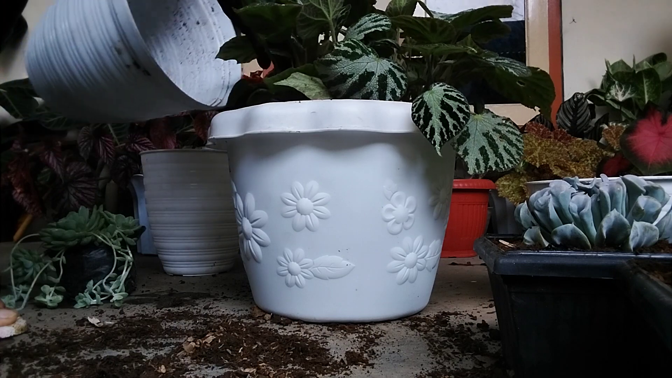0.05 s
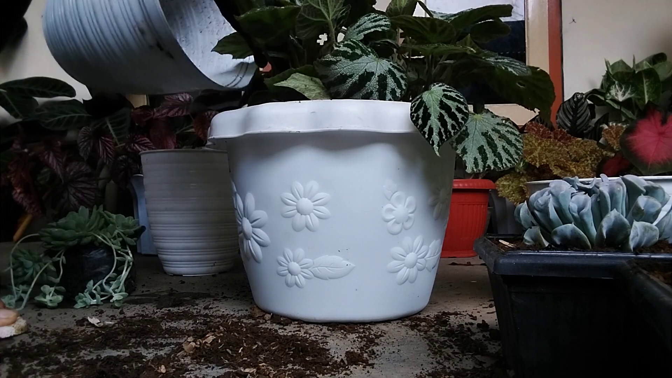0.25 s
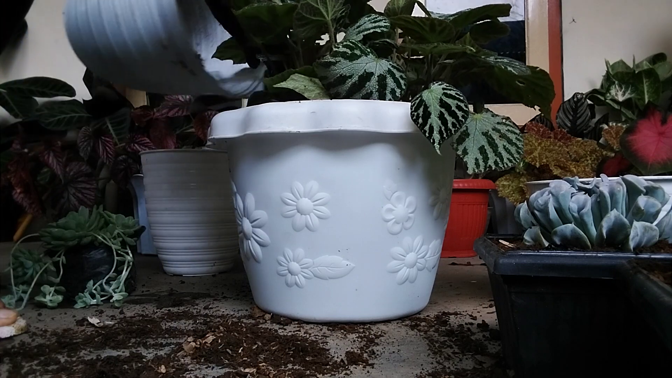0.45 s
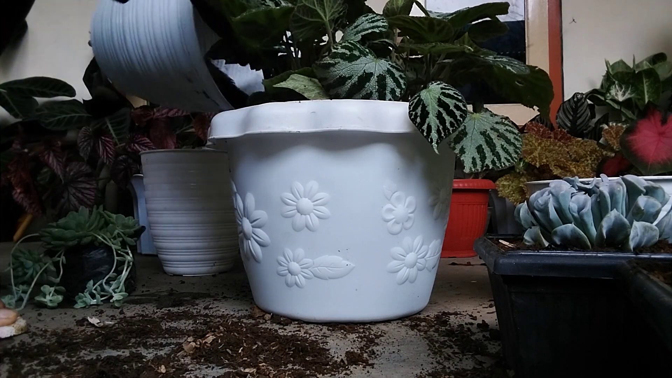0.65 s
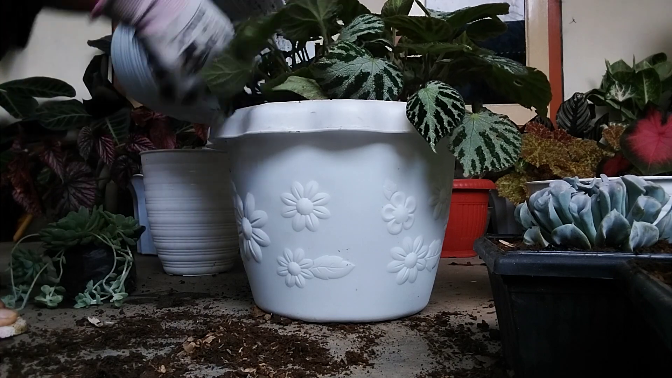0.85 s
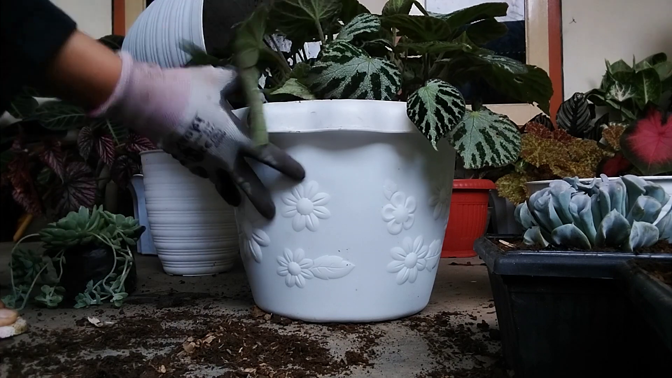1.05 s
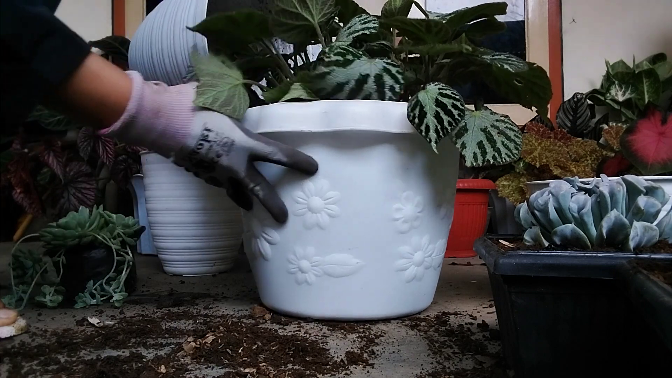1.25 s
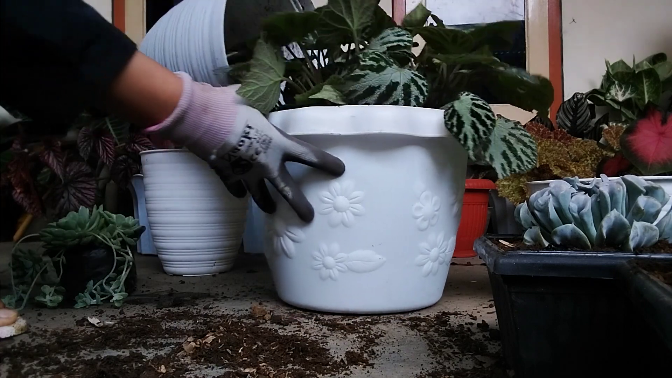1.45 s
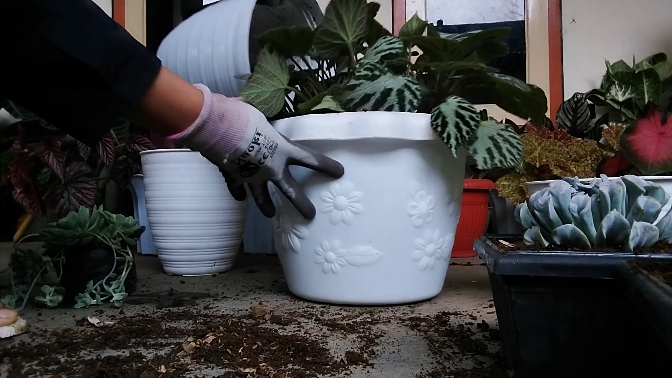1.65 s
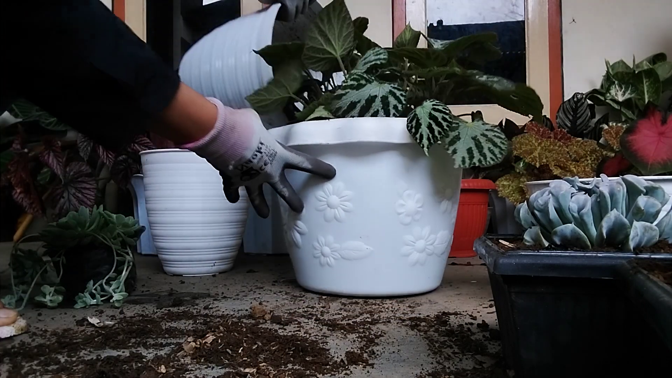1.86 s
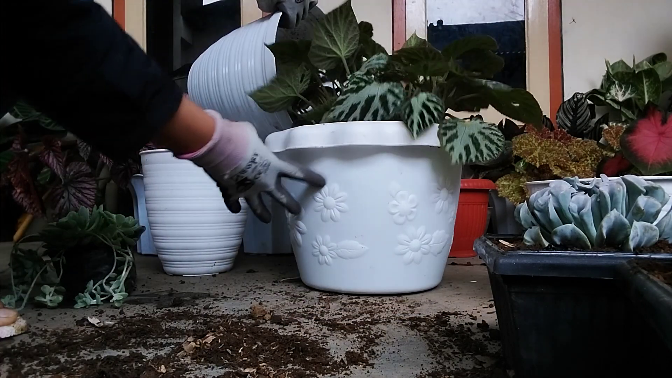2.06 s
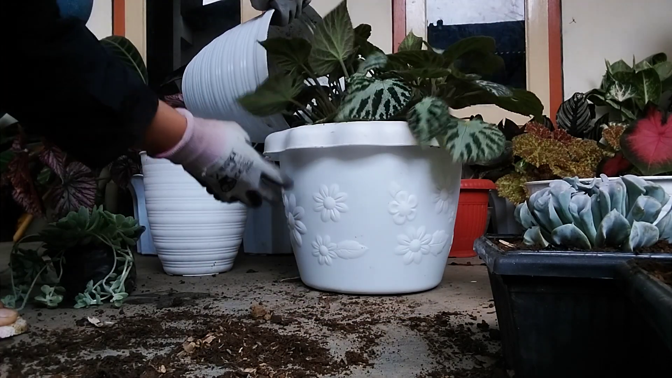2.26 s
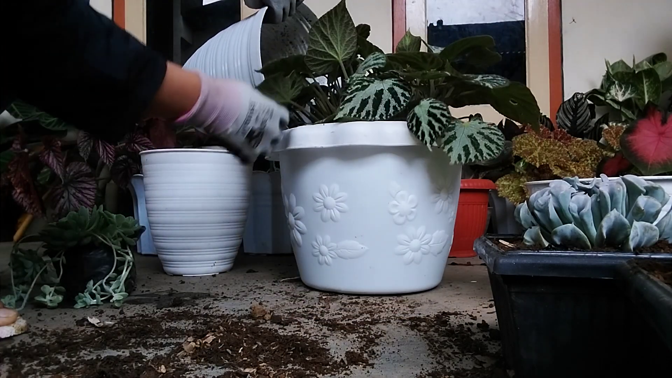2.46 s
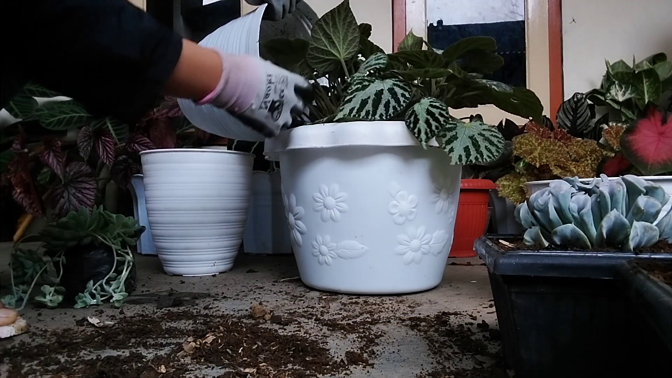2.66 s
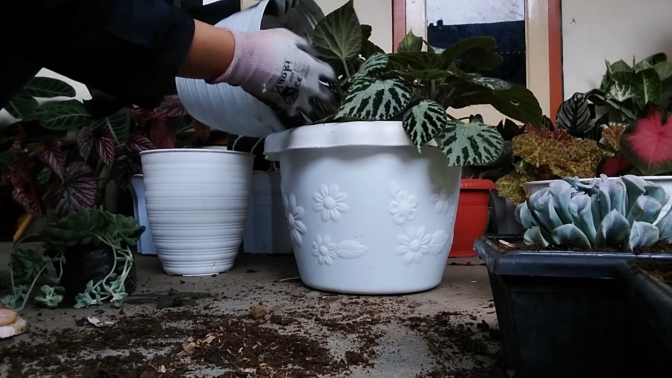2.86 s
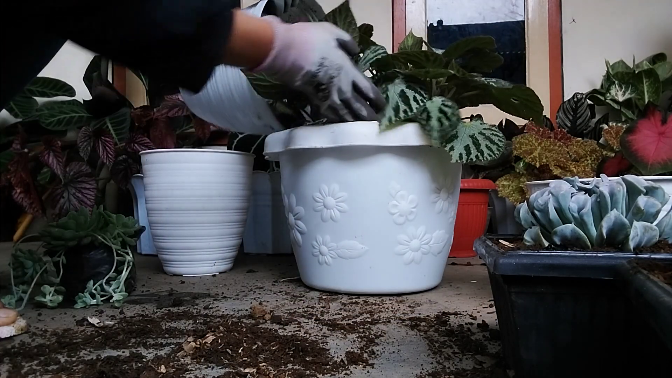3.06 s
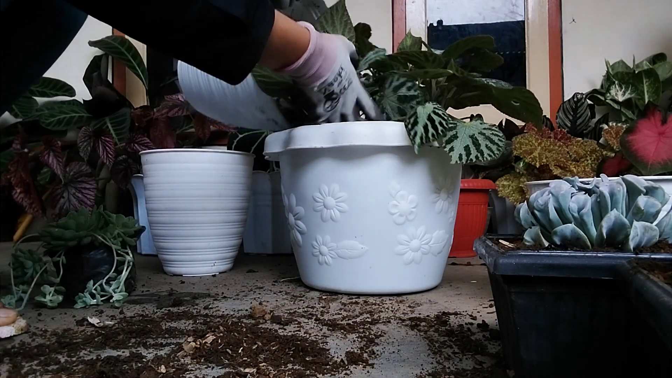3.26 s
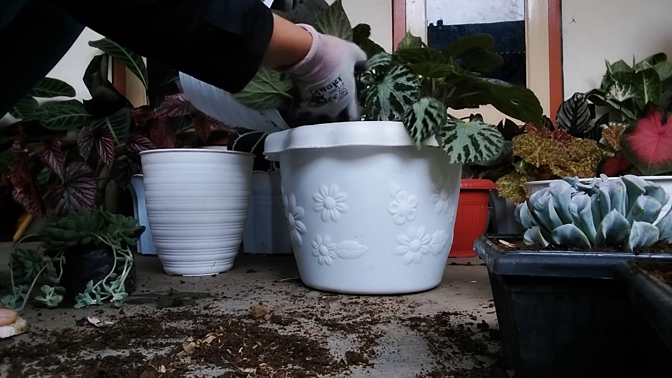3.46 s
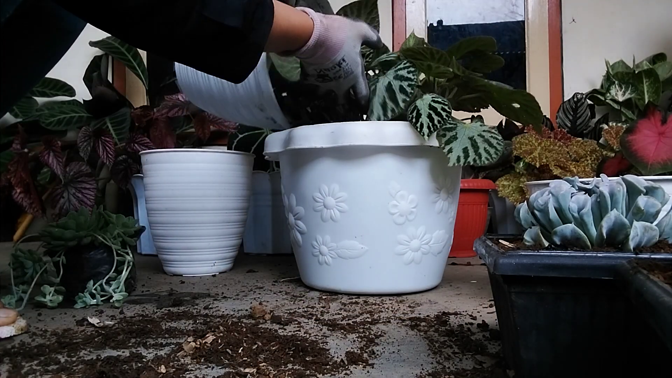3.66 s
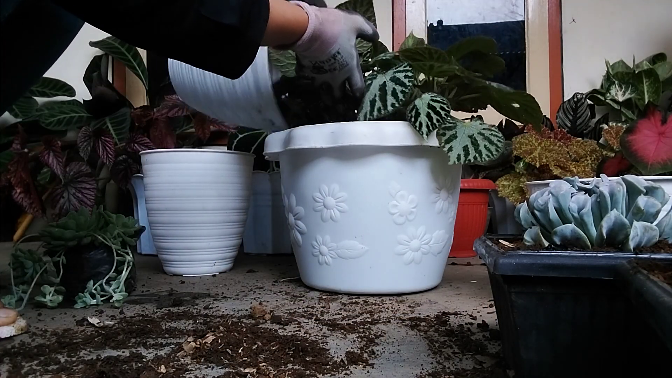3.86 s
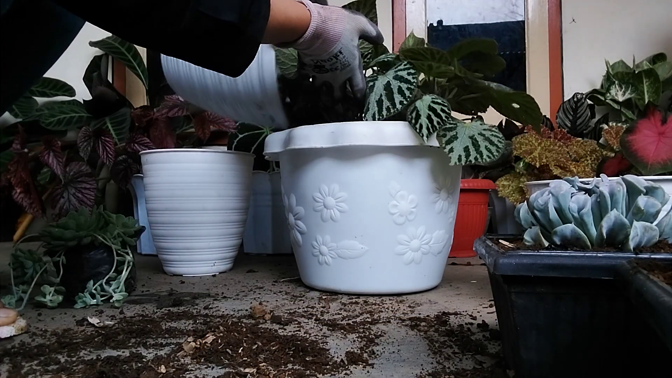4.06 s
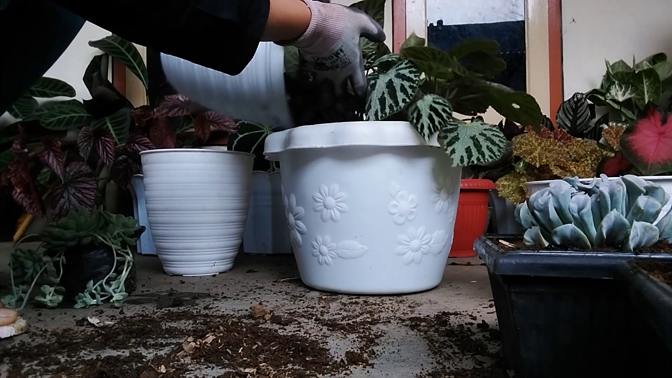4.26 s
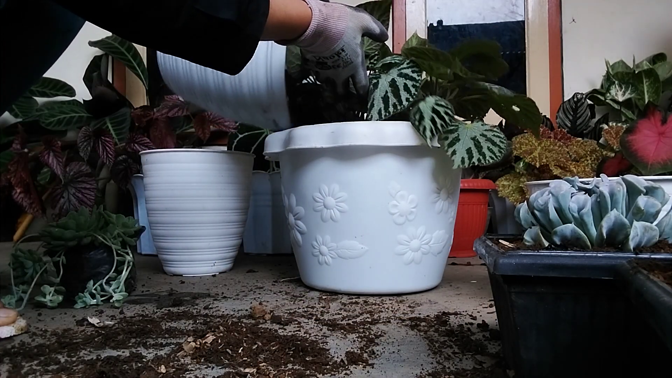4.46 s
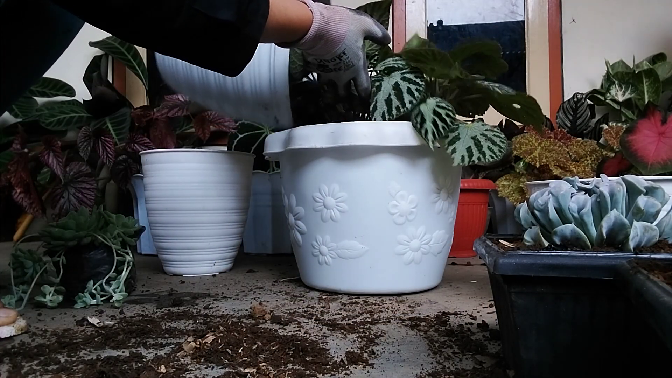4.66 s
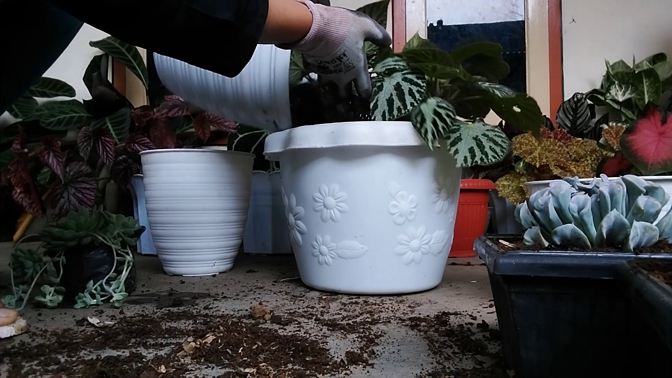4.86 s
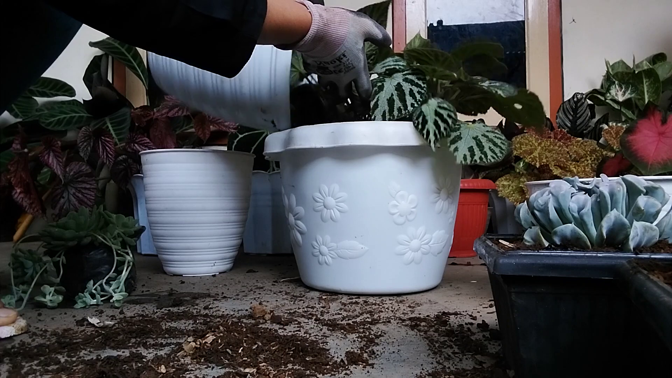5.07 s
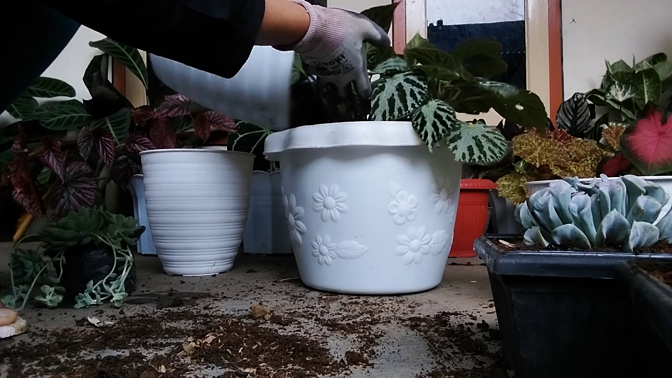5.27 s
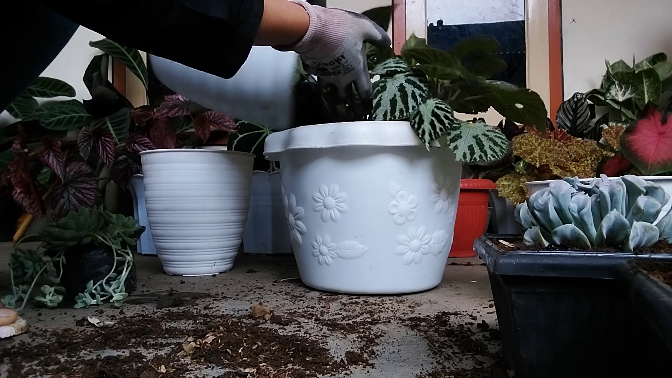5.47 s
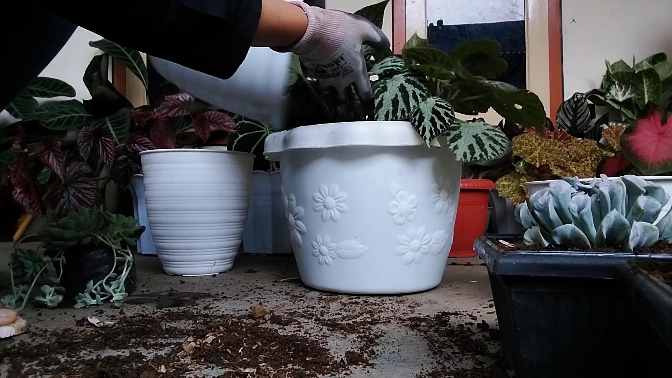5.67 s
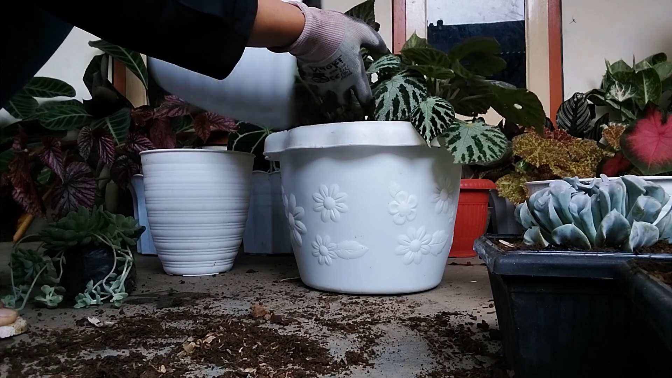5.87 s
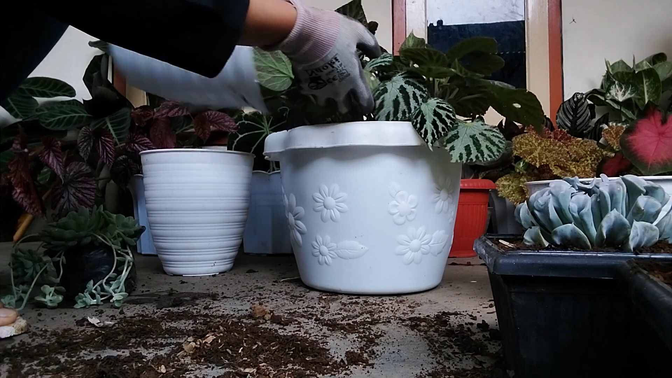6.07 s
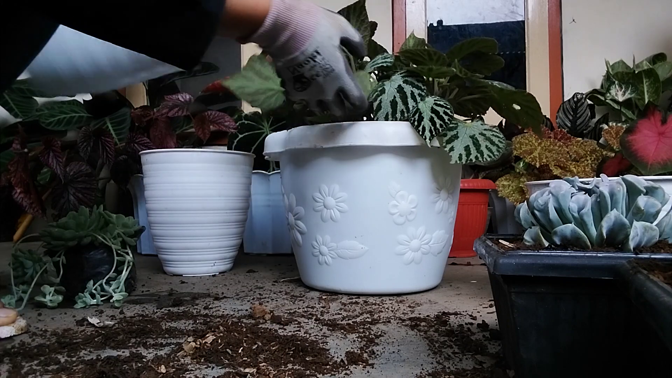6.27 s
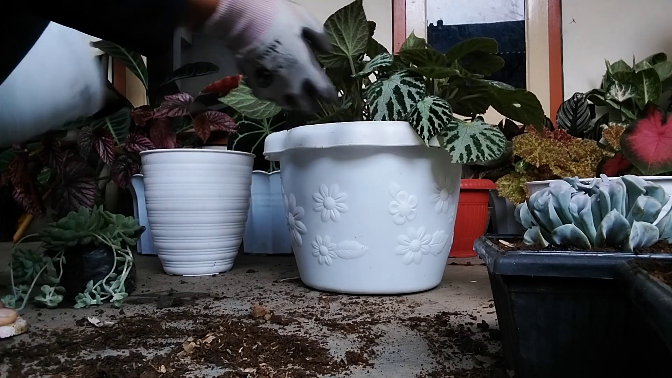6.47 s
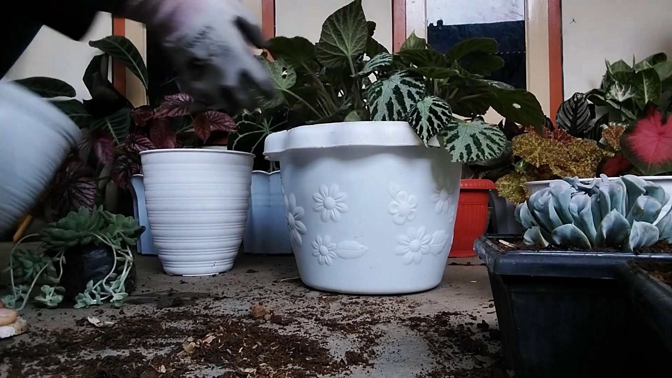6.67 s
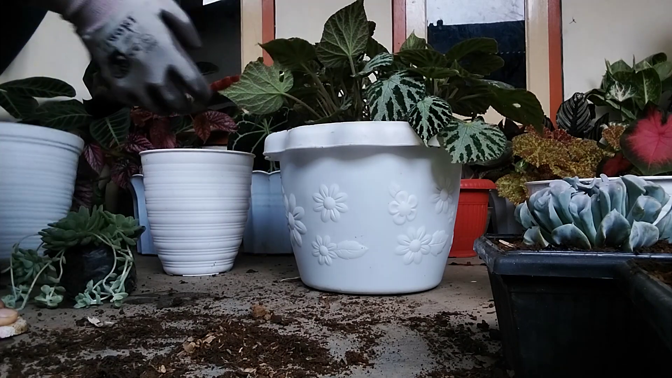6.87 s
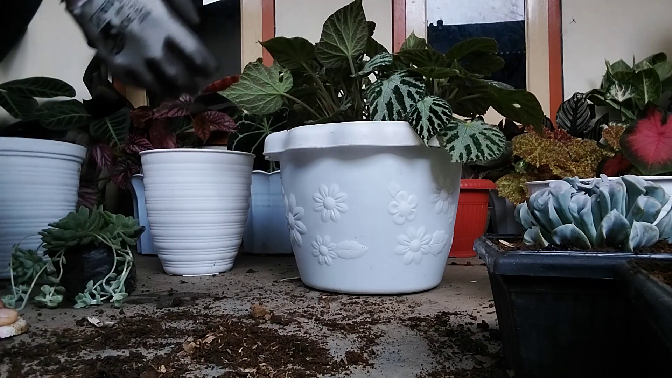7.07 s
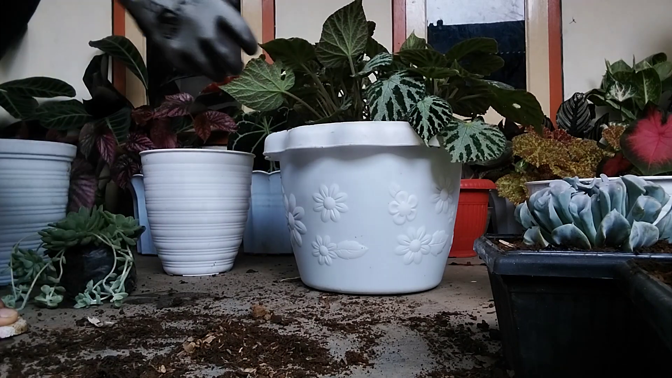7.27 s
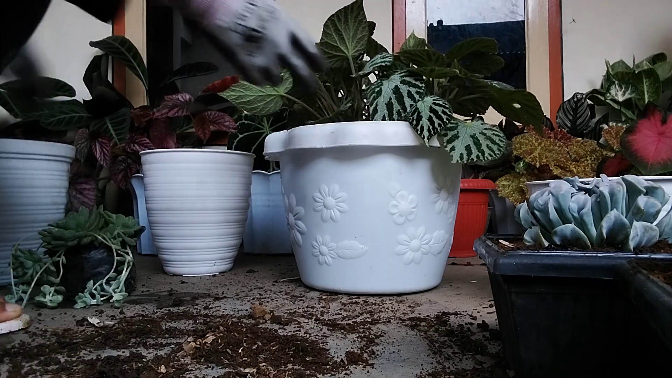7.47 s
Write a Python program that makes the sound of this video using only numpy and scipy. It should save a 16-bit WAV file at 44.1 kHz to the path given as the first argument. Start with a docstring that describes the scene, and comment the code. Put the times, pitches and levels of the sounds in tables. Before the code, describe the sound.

Close stereo sound on a walled porch with short, dull reflections and a very faint, wavering motor hum far off. From 0.2 to 0.9 s a thin plastic pot clacks lightly, mix slithers softly inside it, and a double knock comes near 0.9 s with a crumbly brush. At about 1.3 s gritty potting mix pours into a larger pot: a bright, clumpy hiss with soft drumming, low clod thumps and sharp coarse ticks, strongest around 1.7-2.0 s, stopping by 2.2 s. Near-quiet follows. From 3.0 s a gloved hand presses the mix; thuds and papery plastic clacks repeat roughly every 0.2 s, heaviest at 3.4-4.3 s, with loose grains crackling, until just after 6 s. Light rustling fades. At 7.1-7.4 s the empty pot gives short, hollow, quickly damped bumps and gritty scrapes as it is put aside.

```python
"""Throughout, a motor hums far away, two wavering sinusoids over faint shaped-noise air.
First a small plastic pot on a walled porch knocks and mix slips inside it as it tilts; then gritty potting mix is
tipped into a larger pot, its stream of random impacts hissing and drumming. A gloved hand next presses the mix in:
modes thud, noise bursts clack from the thin wall, and loose grains crackle.
At the end the emptied pot bumps hollowly, as damped modes, and scrapes, as dense grains, while it is put aside."""
import sys
import numpy as np
from scipy import signal
from scipy.fft import rfft, irfft
from scipy.io import wavfile

SR = 44100
rng = np.random.default_rng(int(sys.argv[2]) if len(sys.argv) > 2 else 0)


def wav_out(sig):
    """Save sig, one row per channel (or a flat mono array), as 16-bit PCM at SR to the path in sys.argv[1]."""
    wavfile.write(sys.argv[1], SR, np.round(np.clip(np.atleast_2d(sig).T, -1, 1) * 32767).astype(np.int16))


N = 331191
TIME = np.arange(N) / SR

# All levels in dB are relative to the source they drive.
# far motor: (t/s, level/dB)
MOTOR_LEVEL = [(0, -64), (.3, -50.5), (2.3, -44.5), (2.7, -60.5), (3.5, -50.5), (4.6, -48.5), (5.05, -70),
               (5.35, -54), (7.0, -55.5), (7.51, -38.5)]
# spectrum of the faint outdoor air: (f/Hz, density level/dB per Hz)
AIR_SPECTRUM = [(25, -51.5), (60, -18), (108, -13.5), (230, -20), (775, -43), (1400, -48.5), (1840, -56),
                (8590, -50.5), (11300, -44), (16000, -53)]
# mix and leaves disturbed by the gloved hand at the pots: (t/s, level/dB)
HANDLING_LEVEL = [(0, -73), (1.3, -66.5), (2.3, -78.5), (2.975, -102), (3.03, -67), (4.1, -71), (5.6, -62),
                  (6.25, -76), (7.51, -69.5)]
# brushes of the glove through the mix without a knock: (peak t/s, level/dB)
GLOVE_BRUSHES = [(0.941, -51.5), (1.21, -60.5), (3.28, -58.5), (4.458, -54), (4.881, -59), (5.339, -52.5),
                 (5.49, -54.5), (5.66, -52), (5.82, -57), (6.42, -66), (6.8, -63), (6.93, -67.5)]
# spectrum of loose crumbling mix: (f/Hz, density level/dB per Hz)
LOOSE_SPECTRUM = [(470, -26.5), (900, -7.5), (1400, -3.5), (1650, -8.5), (2500, 0), (3050, -7),
                  (4740, -6.5), (8770, -11), (11300, -4.5), (14000, -10.5), (16000, -18.5)]
# knocks of the thin pot: (t/s, thud level/dB, clack level/dB, grit level/dB)
POT_KNOCKS = [(0.171, -53.5, -24, -45), (0.218, -50.5, -26.5, -31.5), (0.487, -51, -37.5, -53),
              (0.665, -49.5, -41, -53), (0.872, -38, -23.5, -27.5), (0.923, -39, -32, -35),
              (2.991, -45.5, -35.5, -41), (3.02, -47.5, -27, -28), (3.201, -35, -34.5, -59),
              (3.4181, -26, -11, -19), (3.633, -30, -25, -52), (3.854, -29, -16.5, -49),
              (4.063, -29, -17, -46), (4.275, -28, -12.5, -21.5), (4.499, -35, -29, -39),
              (4.692, -37.5, -26, -26), (4.935, -40.5, -25, -38), (5.143, -32.5, -17, -26.5),
              (5.39, -48, -46, -39), (5.592, -41, -20.5, -26.5), (5.618, -43, -27, -26.5),
              (5.926, -52, -35, -61), (6.025, -40, -18.5, -25), (6.038, -34, -23, -35),
              (6.074, -41.5, -30, -42)]
# nominal modes of the filled pot: (f/Hz, level/dB, t60/s)
FILLED_POT_MODES = [(146.5, -13.5, 0.2), (203.9, -3.5, 0.13), (267, 0, 0.073), (310.6, -5.5, 0.16),
                    (367, 0, 0.078), (494, -17.5, 0.086)]
# spectrum of the clacking plastic wall: (f/Hz, density level/dB per Hz)
WALL_SPECTRUM = [(200, -19), (500, -9), (720, -3.5), (1100, 4.5), (1450, 2.5), (1720, -4.5), (2200, 3.5),
                 (2900, -10.5), (4300, -14.5), (9000, -39.5)]
# single coarse bits striking plastic: (t/s, level before colouring/dB)
COARSE_BITS = [(0.237, -39), (0.6511, -29), (1.2881, -15), (1.362, -16.5), (1.743, -8.5), (1.869, -7),
               (1.903, -3), (1.966, -11), (4.776, -33), (6.6284, -44.5), (6.917, -39)]
# spectrum of hard grit: (f/Hz, density level/dB per Hz)
GRIT_SPECTRUM = [(700, -32), (1250, -4), (1650, -9), (2430, -1.5), (3600, -5.5), (5020, -0.5), (6500, -2),
                 (7490, 3), (8820, -4.5), (11600, 2.5), (14000, 0), (16000, -10.5)]
# slips of mix inside the tilting pot: (peak t/s, level/dB)
MIX_SLIPS = [(0.411, -65), (0.519, -45.5), (0.656, -49.5), (.715, -53)]
# scrapes of the empty pot over grit: (peak t/s, level/dB, 20 dB rise t/s, 20 dB fall t/s)
POT_SCRAPES = [(7.104, -40.5, 0.018, 0.043), (7.22, -31.5, 0.051, 0.017), (7.28, -42.5, 0.023, 0.12),
               (7.406, -42, 0.088, 0.063), (7.51, -47, 0.027, .05)]
# spectrum of sliding contact: (f/Hz, density level/dB per Hz)
SLIDE_SPECTRUM = [(530, -8.5), (900, -2), (1450, -2), (1900, -10), (2450, -2.5), (3600, -11), (5000, -11),
                  (8800, -20), (11300, -16.5), (16000, -25)]
# flow of the poured stream: (t/s, level/dB)
POUR_FLOW = [(1.285, -43.5), (1.33, -34), (1.45, -32.5), (1.5, -28.5), (1.79, -30.5), (1.845, -33.5),
             (1.895, -30), (2.07, -32.5), (2.16, -55)]
# spectrum of crumbs drumming on the pot: (f/Hz, density level/dB per Hz)
DRUM_SPECTRUM = [(29, -52.5), (81, -15), (161, -10.5), (215, -7.5), (262, 1), (320, -8.5), (400, -13),
                 (560, -10.5), (690, -10.5), (800, -18), (1390, -24), (1620, -28), (3500, -48)]
# clods landing in the pot: (t/s, level/dB)
CLOD_LANDINGS = [(1.48, -27), (1.55, -26), (1.709, -25), (1.784, -27), (1.863, -25), (1.902, -24.5),
                 (1.933, -24)]
# bumps of the empty pot: (t/s, level/dB, t/s until the glove damps it)
EMPTY_BUMPS = [(7.117, -8, 0.019), (7.258, -9.5, 0.057), (7.36, -17.5, 0.047), (7.374, -13.5, 0.0154)]
# nominal undamped modes of the empty pot: (f/Hz, level/dB, t60/s)
EMPTY_POT_MODES = [(208.5, -16, 0.39), (271.5, -14, 0.2), (348.6, 2, 0.11), (578, -28, 0.093),
                   (685, -45, 0.0074)]
# diffuse decay of the porch: (f/Hz, t60/s)
PORCH_DECAY = [(100, 1), (300, 0.63), (800, 0.33), (2000, 0.35), (6000, 0.33), (14000, 0.26)]
# echoes of the nearby floor and walls: (delay t/s, level before dulling and wet gain/dB)
NEAR_ECHOES = [(.0058, -12), (0.017, -14.5), (0.055, -13.5)]
# difference in colour of the two microphones: (f/Hz, left minus right level/dB)
MICROPHONE_COLOUR = [(100, -3), (600, -2), (800, -1), (1300, -5.5), (1650, 2), (2350, -6), (3200, -4),
                     (5600, 3), (11000, -10.5), (14500, 0)]

AIR_DB = -64.5
# mix gives way at every knock: level at a thud of 0 dB, dB per dB of thud
GIVE_DB, GIVE_FOLLOWS = -43, 0.43
GIVE_MOST_DB = 9  # ceiling above the handling level: the hand must be in the mix
# times of a 20 dB rise and fall
GIVE_RISE_S, GIVE_FALL_S = 0.096, 0.11
BRUSH_RISE_S, BRUSH_FALL_S = 0.09, 0.13
SLIP_RISE_S, SLIP_FALL_S = 0.064, 0.045
REBOUND_THUD_DB, REBOUND_CLACK_DB = -3, -7.5  # relative to the first contact
RASP_SPLIT_HZ, RASP_LEAD_S = 1560, 0.0085  # the low part of a scrape leads the high part
DRUM_DB, CRUMBS_BUILD_S = 1.5, 0.05  # drumming relative to the grit; build-up time constant
CUTOFF_HZ = 16200


def from_db(db):
    """An amplitude gain is ten to the power of its level over 20 dB."""
    return 10 ** (np.asarray(db) / 20)


def rms_one(x):
    """Division by the root mean square gives unit mean power."""
    return x / np.sqrt(np.mean(x ** 2) + 1e-20)


def gain_curve(rows):
    """A level linear in dB between points varies exponentially in gain; outside them it is negligible."""
    s, db = np.transpose(rows)
    return from_db(np.interp(TIME, s, db, left=-140, right=-140))


def at_hz(points, hz):
    """Interpolation over log frequency gives equal ratios equal distance."""
    points = np.array(points)
    return np.interp(np.log(hz + 1), np.log(points[:, 0]), points[:, 1])


def drift(rate):
    """Random values joined at a given rate per second form a slow fluctuation of unit RMS."""
    knots = rng.standard_normal(4000)
    return rms_one(np.interp(TIME * rate, np.arange(len(knots)), knots))


def swell(s, db, rise_s, fall_s):
    """Exponential growth and decay: 20 dB up to the peak in rise_s, 20 dB down in fall_s."""
    away = np.maximum((s - TIME) / rise_s, (TIME - s) / fall_s)
    return from_db(db - 20 * np.minimum(away, 10))


def colour(x, spectrum):
    """Folding the cepstrum of a magnitude spectrum yields its causal, minimum-phase filter."""
    size = 4096
    hz = np.arange(size + 1) * SR / 2 / size
    cepstrum = irfft(np.log(from_db(at_hz(spectrum, hz))))
    cepstrum[1:size] *= 2
    cepstrum[size + 1:] = 0
    impulse_response = irfft(np.exp(rfft(cepstrum)))[None, :size]
    return signal.oaconvolve(x, impulse_response, axes=-1)[:, :N]


def strike(times, levels_db, modes, vary_db, detune):
    """A blow excites decaying modes; its place alters their strength and pitch."""
    out, t = np.zeros(N + SR), TIME[:SR // 3]
    hz, mode_db, t60 = np.array(modes).T[:, :, None]
    for s, db in zip(times, levels_db):
        at = int(s * SR)
        louder, sharper = rng.uniform(-1, 1, (2, len(modes), 1))
        tones = np.sin(2 * np.pi * hz * (1 + detune * sharper) * t)
        decay = from_db(db + mode_db + vary_db * louder - 60 * t / t60)
        out[at:at + len(t)] += (tones * decay).sum(axis=0)
    return out[:N]


def spray(times, levels_db, t60):
    """Many tiny contacts sum to a noise burst that swells and decays, partly shared by both ears."""
    out, t = np.zeros((2, N + SR)), TIME[:SR // 5]
    onset = 1 - np.exp(-t / 0.0008)
    for s, db in zip(times, levels_db):
        at = int(s * SR)
        burst = rng.standard_normal((2, len(t))) + 0.5 * rng.standard_normal(len(t))
        out[:, at:at + len(t)] += burst * onset * from_db(db - 60 * t / t60)
    return out[:, :N]


def grains(per_s, spread_db, t60, count=8):
    """Granular flow is random impacts of uneven size; each kind has its own brief ring at either ear."""
    sizes = from_db(spread_db * np.minimum(rng.exponential(1, N), 4)) * rng.choice([-1, 1], N)
    clicks = sizes * (rng.random(N) < per_s / SR)
    kind = rng.integers(0, count, N)
    t = TIME[:SR // 100]
    noise = rng.standard_normal((count, 2, len(t))) + 0.56 * rng.standard_normal((count, 1, len(t)))
    rings = noise * from_db(-60 * t / t60)
    return sum(signal.oaconvolve((clicks * (kind == k))[None], rings[k], axes=-1)[:, :N]
               for k in range(count))


def narrow_bass(x, split_hz=750):
    """Long waves reach both ears nearly alike, so the low side signal is reduced."""
    mid, side = (x[0] + x[1]) / 2, (x[0] - x[1]) / 2
    high_pass = signal.butter(1, split_hz, "high", fs=SR, output="sos")
    side = 0.051 * side + 0.98 * signal.sosfilt(high_pass, side)
    return np.array([mid + side, mid - side])


def porch(x, wet_db):
    """Reflection adds dull early echoes and a diffuse tail, decaying band by band, to direct sound."""
    t, edges = TIME[:SR * 3 // 4], np.geomspace(50, 19000, 13)
    white, tail = rng.standard_normal((2, 2, len(t))), 0
    for k, (low, high) in enumerate(zip(edges, edges[1:])):
        band_pass = signal.butter(2, [low, high], "band", fs=SR, output="sos")
        band = rms_one(signal.sosfilt(band_pass, white[k % 2])) * np.sqrt(high - low)
        tail = tail + band * from_db(-60 * t / at_hz(PORCH_DECAY, np.sqrt(low * high)))
    tail = rms_one(narrow_bass(tail * np.clip(t / 0.0068, 0, 1))) / np.sqrt(len(t))
    echoes = np.zeros(len(t))
    for delay, db in NEAR_ECHOES:
        echoes[int(delay * SR)] = from_db(db)
    response = tail + signal.sosfilt(signal.butter(1, 2500, fs=SR, output="sos"), echoes)
    direct = x * np.ones((2, 1))
    return direct + from_db(wet_db) * signal.oaconvolve(direct, response, axes=-1)[:, :N]


def background():
    """Frequency and amplitude modulation waver the far motor's two lines over filtered-noise air."""
    hum = 0
    for hz, db in ((69.5, -7.0), (99, -10.5)):
        phase = 2 * np.pi * np.cumsum(hz * (1 + 0.02 * drift(16))) / SR
        hum = hum + np.sqrt(2) * np.sin(phase) * from_db(db + 0.78 * drift(16))
    air = rms_one(colour(narrow_bass(rng.standard_normal((2, N))), AIR_SPECTRUM))
    return hum * gain_curve(MOTOR_LEVEL) + from_db(AIR_DB) * air


def rustle():
    """Granular friction crackles in loose mix: faint under the hand, stronger at pushes and brushes."""
    crackle = rms_one(colour(grains(per_s=1300, spread_db=3.0, t60=0.0036, count=12), LOOSE_SPECTRUM))
    crackle = crackle * from_db(1.0 * drift(45))
    pushes = [swell(s, GIVE_DB + GIVE_FOLLOWS * thud_db, GIVE_RISE_S, GIVE_FALL_S)
              for s, thud_db, _, _ in POT_KNOCKS]
    brushes = [swell(s, db, BRUSH_RISE_S, BRUSH_FALL_S) for s, db in GLOVE_BRUSHES]
    handling = gain_curve(HANDLING_LEVEL)
    giving = np.minimum(np.max(pushes, axis=0), handling * from_db(GIVE_MOST_DB))
    return porch(crackle * np.max([handling, giving, *brushes], axis=0), wet_db=-3.5)


def knocks():
    """Impact excites the pot's modes, rattles its soil-damped wall and shakes grit loose."""
    s, thud_db, clack_db, grit_db = np.transpose(POT_KNOCKS)
    # the pot rocks and touches down again, more softly
    twice = np.r_[s, s + rng.uniform(0.007, 0.019, len(s))]
    thud_levels = np.r_[thud_db, thud_db + REBOUND_THUD_DB]
    clack_levels = np.r_[clack_db, clack_db + REBOUND_CLACK_DB]
    thud = strike(twice, thud_levels, FILLED_POT_MODES, vary_db=1, detune=0.1)
    # a small pot radiates little bass
    thud = signal.sosfilt(signal.butter(2, 105, "high", fs=SR, output="sos"), thud)
    clack = colour(spray(twice, clack_levels, t60=0.019), WALL_SPECTRUM)
    grit = colour(spray(s, grit_db, t60=0.018), LOOSE_SPECTRUM)
    return porch(thud, wet_db=-3.5) + porch(clack, wet_db=-1.5) + porch(grit, wet_db=-5.5)


def bits():
    """The brief impact of a hard coarse bit on plastic gives a sharp broadband tick."""
    ticks = spray(*np.transpose(COARSE_BITS), t60=0.012)
    return porch(colour(ticks, GRIT_SPECTRUM), wet_db=-3.5)


def slides():
    """Sliding friction is a train of impacts: sparse as mix slips in the pot, dense as the pot rasps on grit."""
    scratch = colour(grains(per_s=700, spread_db=5.0, t60=0.0063), SLIDE_SPECTRUM)
    slither = rms_one(signal.sosfilt(signal.butter(2, 2600, "high", fs=SR, output="sos"), scratch))
    rasp = rms_one(colour(grains(per_s=4000, spread_db=1.5, t60=0.0091), SLIDE_SPECTRUM))
    slipping = sum(swell(s, db, SLIP_RISE_S, SLIP_FALL_S) for s, db in MIX_SLIPS)
    dragging = sum(swell(*scrape) for scrape in POT_SCRAPES)
    dull = signal.sosfilt(signal.butter(3, RASP_SPLIT_HZ, "low", fs=SR, output="sos"), rasp)
    bright = signal.sosfilt(signal.butter(3, RASP_SPLIT_HZ, "high", fs=SR, output="sos"), rasp)
    # a scrape starts dull and brightens as it gathers speed
    starting = np.interp(TIME + RASP_LEAD_S, TIME, dragging)
    return porch(slither * slipping + dull * starting + bright * dragging, wet_db=-6.0)


def pour():
    """Random impacts fuse into a stream: fine grit hisses while heavier crumbs and clods drum on the pot."""
    grit = rms_one(colour(grains(per_s=3700, spread_db=-0.5, t60=0.0021, count=14), GRIT_SPECTRUM))
    grit = grit * from_db(2.0 * drift(120))  # clumps in the flow
    drum = narrow_bass(grains(per_s=1800, spread_db=0.5, t60=0.0027), split_hz=4800)
    drum = rms_one(colour(drum, DRUM_SPECTRUM))
    # fine grit arrives first; the heavier crumbs build up behind it
    crumbs = 1 - np.exp(-np.maximum(TIME - POUR_FLOW[0][0], 0) / CRUMBS_BUILD_S)
    clods = strike(*np.transpose(CLOD_LANDINGS), [(261.8, 0.003, 0.28)], vary_db=-2, detune=0.066)
    stream = (grit + drum * crumbs * from_db(DRUM_DB)) * gain_curve(POUR_FLOW) + clods
    return porch(stream, wet_db=-11)


def empty_pot():
    """Resonance of the enclosed air booms after each bump until the glove's damping ends it."""
    boom = 0
    for s, db, free in EMPTY_BUMPS:
        blow = strike([s], [db], EMPTY_POT_MODES, vary_db=1, detune=0.008)
        boom = boom + blow * np.exp(-np.maximum(TIME - s - free, 0) / 0.013)
    # a soft contact
    boom = signal.sosfilt(signal.butter(2, [160, 850], "band", fs=SR, output="sos"), boom)
    return porch(boom, wet_db=-8)


def scene():
    """Interaural delay: the pots stand a little to the left, so their sound reaches the right ear later."""
    left, right = rustle() + knocks() + bits() + slides() + pour() + empty_pot()
    lag = 4  # samples
    return np.array([left, np.pad(right, (lag, 0))[:N]]) + background()


def record(dry):
    """Each microphone filters with its own response; a steep low-pass removes the top."""
    channels = []
    for ear, sign in enumerate((1, -1)):
        response = [(hz, sign * db / 2) for hz, db in MICROPHONE_COLOUR]
        channels.append(colour(dry[[ear]], response))
    low_pass = signal.ellip(10, 0.1, 80, CUTOFF_HZ, fs=SR, output="sos")
    return signal.sosfilt(low_pass, np.vstack(channels))


dry = scene()
out = record(dry)
wav_out(out)
```